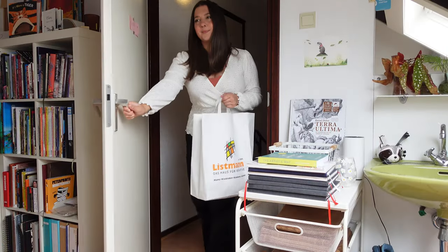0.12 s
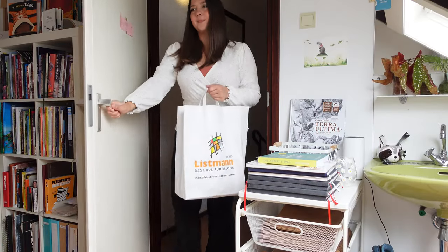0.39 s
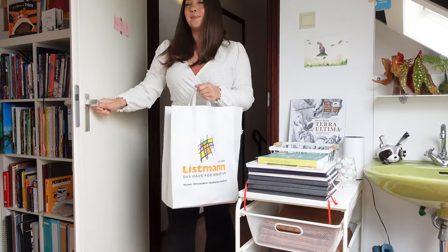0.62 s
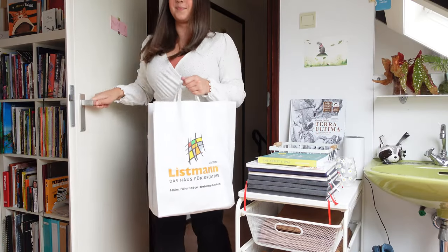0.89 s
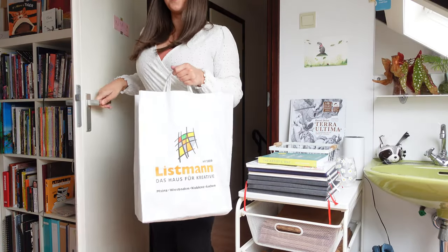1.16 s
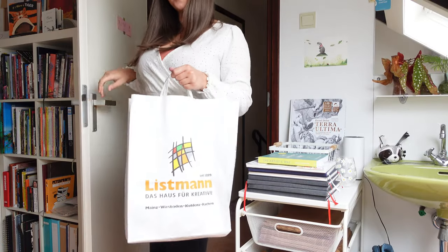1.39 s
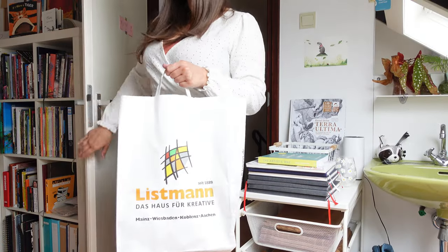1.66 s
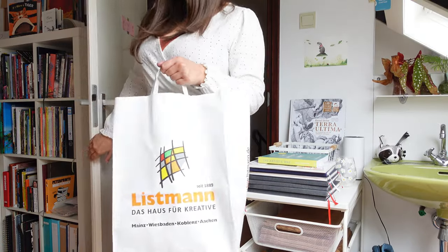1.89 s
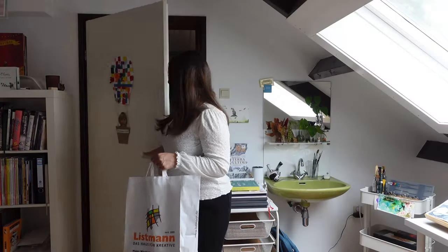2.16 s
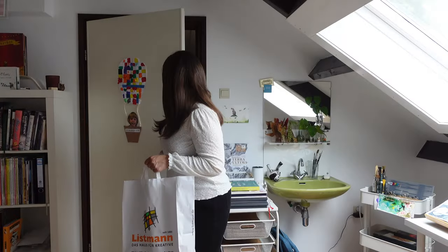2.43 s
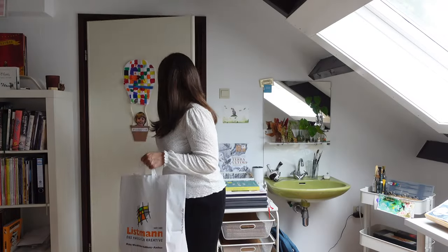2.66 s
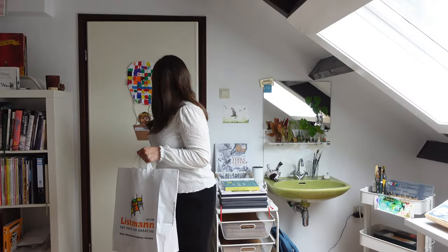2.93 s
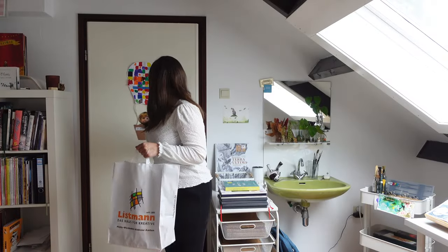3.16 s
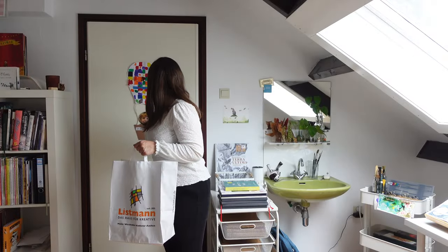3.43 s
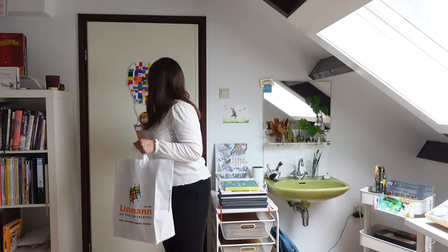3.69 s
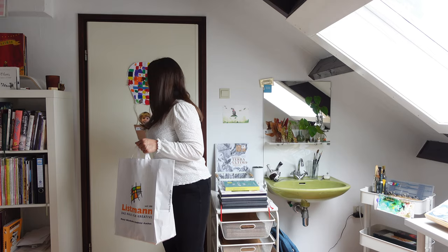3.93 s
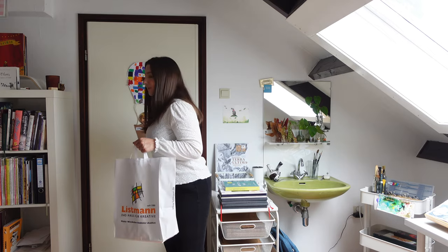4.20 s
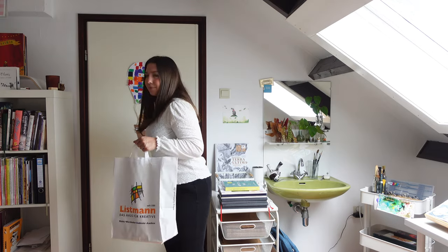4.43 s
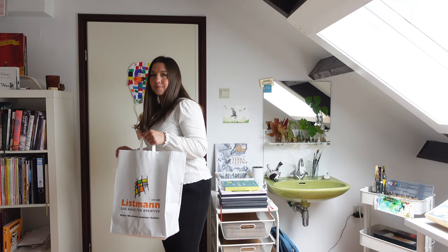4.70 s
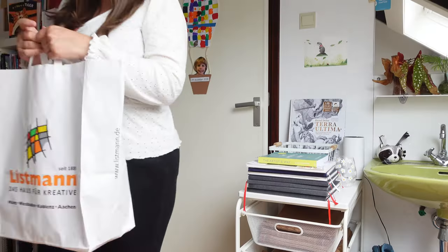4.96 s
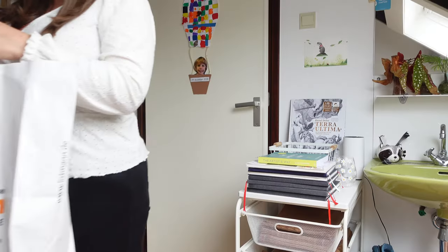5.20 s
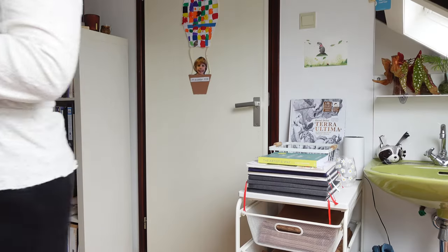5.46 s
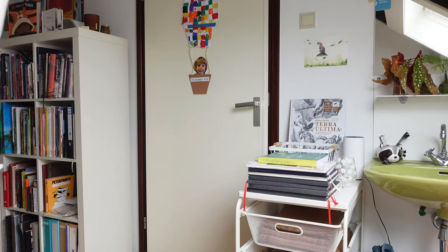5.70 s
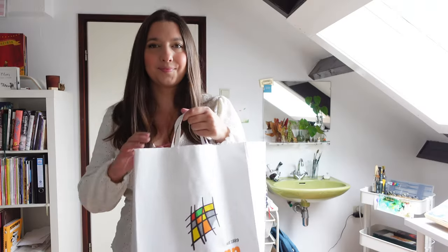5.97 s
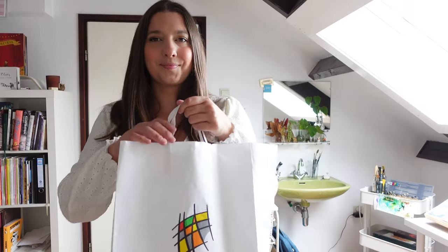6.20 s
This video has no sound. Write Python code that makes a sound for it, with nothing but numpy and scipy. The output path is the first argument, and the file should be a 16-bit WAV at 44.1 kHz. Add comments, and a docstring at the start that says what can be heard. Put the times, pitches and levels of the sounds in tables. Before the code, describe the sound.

Small attic room, fairly close stereo microphone. A stiff paper bag creases and crackles with sharp clicks and dull knocks over faint dry hinge friction and soft floor steps. After an abrupt cut, the handle scrapes and the hollow door grinds loudly into its frame with a low, rattling judder. The latch snaps metallically. Another cut brings close bag crackle and knocks.

```python
"""A stiff bag creases and crackles; its carrier opens a hollow door, enters a small attic room, pushes it shut.
The leaf judders into its frame as wandering mode tones; hinge, handle and bag are filtered friction grains.
Latch modes ring down, clicks and knocks are resonant bursts, feet load the boards, over quiet room noise.
Four spliced shots, each with its own bass cut, share a short reverberation."""
import sys
import numpy as np
from scipy import signal
from scipy.fft import rfft, irfft
from scipy.io import wavfile
from scipy.ndimage import uniform_filter1d

SR = 44100
rng = np.random.default_rng(int(sys.argv[2]) if len(sys.argv) > 2 else 0)


def dump_mix(stems):
    """Bounce the given channels to the path in sys.argv[1] as a 16-bit WAV at rate SR."""
    frames = np.atleast_2d(stems).T  # one column per channel
    limited = np.clip(frames, -1, 1)  # hard clip at full scale
    pcm = np.round(limited * 32767).astype(np.int16)
    wavfile.write(sys.argv[1], SR, pcm)


def rack_gain(trim_db):
    """Turn a fader trim in dB into the linear factor to multiply a signal by."""
    fader = np.asarray(trim_db, float)
    return 10 ** (fader / 20)


N = 279682
T = np.arange(N) / SR

# Door meeting the frame, first touch and grind home: start_s, end_s, force_db
CONTACTS = [(3.29, 3.315, -21), (3.525, 3.752, 0)]
# Answer of each door part to a contact: lag_s, full_force_db, db_per_force_db,
# rise_db_per_s, held_drift_db_per_s, fall_db_per_s
LEAF_ANSWER = (0, -13, 1, 255, -30, 420)
RATTLE_ANSWER = (0.0744, -19.5, 1, 169.5, 1, 133)
SCRAPE_ANSWER = (0.13, -33, 6, 127.5, -8.5, 174)
LOWER_ANSWER = (0.01, -33, 0.2, 450, 38, 300)
# Door panel modes: mode_hz, level_db, favoured_s
# (moment near which the mode is favoured; a moment after the grind leaves it unfavoured)
PANEL_MODES = [(209.4, 1.5, 3.68), (242, 0, 3.63), (279.7, 6, 4.8), (319, -5, 3.71), (343.5, -4, 3.74),
               (368, 0, 3.63), (454.6, -1, 3.65), (520.4, -5.5, 3.7), (568, -5, 3.63), (689, -13, 3.66),
               (791, -12.5, 3.62), (926, -21, 3.6)]
# Air squeezed out of the doorway: time_s, level_db
AIR_PUSH = [(3.24, -51), (3.53, -47.5), (3.7, -35.5), (3.85, -39), (4.1, -60), (4.3, -61), (4.55, -84)]
# Door edge, latch and handle sliding: start_s, held_s, level_db, treble_relative_db
SLIDES = [(2.365, 0.1, -56.5, -10.5), (2.576, 0.061, -43, -27), (2.719, 0.14, -56, -24),
          (3.03, .26, -68.5, -4.5), (3.334, 0.012, -55, -9.5), (3.453, .03, -52.5, -19.5),
          (3.587, 0.12, -46.5, -20.5), (4.005, .04, -51, -24.5), (4.06, 0.08, -57.5, -26.5),
          (4.16, 0.029, -51.5, -25.5), (4.2, 0.019, -43.5, -17.5), (4.485, 0.033, -61.5, -19)]
# Sprung handle modes: mode_hz, width_hz, level_db
HANDLE_MODES = [(1500, 120, -0.5), (2470, 410, 7.5), (2884, 180, 6), (3360, 190, -9), (4380, 77, -18)]
# Latch bolt striking its plate: time_s, level_db, tilt_db_per_octave
LATCH_STRIKES = [(4, -48, -6), (4.187, -40, 2.5), (4.209, -43, -3), (4.249, -49, 2.5)]
# Bolt and plate modes: mode_hz, level_db, t60_s
LATCH_MODES = [(1450, -11, 0.076), (2580, 3.5, 0.11), (3010, -1.5, 0.07), (3660, -1, 0.066),
               (4300, -9, 0.053), (6100, -16, 0.031), (8090, -4.5, 0.042), (10100, -18, 0.021)]
# Dry hinge squeal as the door swings: time_s, level_db
HINGE_SWING = [(.2, -62), (.45, -65.5), (.57, -53), (.78, -53.5), (.9, -69), (1.65, -77), (1.95, -67.5),
               (2.05, -79), (2.84, -65), (2.89, -64), (2.96, -61.5), (3.1, -72.5)]
# Hinge modes: mode_hz, width_hz, level_db
HINGE_MODES = [(1160, 300, -0.5), (2120, 340, 0.5), (2850, 160, 1), (3490, 450, 0), (6470, 400, -4)]
# Bag movements: start_s, held_s, crease_db, crackle_relative_db, body_relative_db
RUSTLES = [(0.053, 0.0054, -46.5, -3.5, 5), (0.199, .33, -59.5, -6, -1.5), (.57, .24, -55, -13, -2.5),
           (.85, 0.015, -44, -14.5, -5), (0.896, 0.0017, -43, -12, 5), (1.02, 0.215, -66.5, 1, 7),
           (1.369, 0.0093, -49.5, -19, 7), (1.55, .17, -66, 1.5, 0), (1.77, 0.047, -59.5, 4.5, -6),
           (4.989, 0.023, -54, 8.5, 2.5), (5.038, 0.0017, -47, -22, 0), (5.12, 0.08, -58.5, 0.5, -2.5),
           (5.235, 0.037, -56, 7, 0), (5.33, 0.149, -57.5, 2, -3), (5.5, .28, -63, 1.5, -5.5),
           (5.83, 0.11, -60, 2.5, -14.5), (6.013, 0.065, -48.5, 1, 1.5), (6.12, 0.16, -55, -6, 2),
           (6.31, .015, -56.5, -12, -11), (6.338, .005, -46.5, 1.5, -10)]
# Clicks of latch and creases: time_s, level_db, centre_hz
CLICKS = [(.83, -41, 6300), (0.878, -28, 3260), (1.341, -36, 2500), (1.663, -48, 3170), (2.365, -47, 1310),
          (2.436, -47, 3720), (2.557, -39.5, 1290), (2.579, -31, 3000), (3.099, -48, 4580),
          (3.329, -49.5, 1410), (3.451, -39.5, 1800), (3.578, -40.5, 1500), (3.999, -42.5, 2590),
          (4.188, -45, 5520), (4.208, -31, 2216), (4.483, -49, 3860), (5.233, -42.5, 9000),
          (5.266, -41.5, 8950), (5.3665, -41.5, 5860), (6.0095, -34, 2230), (6.187, -35, 2970),
          (6.244, -31.5, 1740), (6.308, -44.5, 6960)]
# Duller knocks and short rubs on door and bag: time_s, level_db, centre_hz, width_hz, t60_s
KNOCKS = [(.05, -43, 840, 500, 0.54), (.884, -26, 737, 400, 0.25), (1.073, -38, 1250, 900, 0.15),
          (1.342, -33, 960, 250, 0.16), (1.35, -24.5, 304, 43.4, 0.23), (1.426, -33.5, 300, 80, 0.17),
          (1.849, -47.5, 860, 600, 0.13), (3.268, -41, 290, 148.7, 0.43), (3.424, -38, 420, 396, 0.66),
          (2.78, -47, 1340, 500, 0.36), (2.88, -45.5, 3080, 1500, 0.72), (4.135, -48.5, 1410, 300, 0.89),
          (4.147, -52, 4380, 220, 0.23), (4.195, -36.5, 580, 700, 0.6), (4.49, -49.5, 324, 200, 0.47),
          (5.022, -31.5, 950, 600, 0.16), (5.66, -38.5, 523.7, 504, 0.5), (5.84, -53.5, 2480, 250, 0.77),
          (6.244, -32, 1080, 500, 0.17)]
# Feet and door loading the floor boards: time_s, level_db
BOARD_LOADS = [(.04, -51.5), (.58, -55), (1.05, -58), (1.2, -59), (1.4, -46), (1.46, -62), (1.8, -54),
               (2.22, -56), (2.6, -57), (3.13, -63.5), (3.22, -53), (4.15, -60), (4.55, -63), (5.05, -55),
               (5.2, -55.5), (5.35, -59), (5.7, -61.5), (6.05, -63.5)]
# Floor board modes: mode_hz, width_hz, level_db
BOARD_MODES = [(115, 26, -2), (155.5, 52, 1), (199.6, 38, -0.5), (285, 47, -3)]
# Room tone spectrum shape: frequency_hz, relative_db_per_hz
AIR_SPECTRUM = [(18, -47), (30, -58.5), (97, 2), (130, -8), (400, -9), (3600, -22.5), (5620, -24.5),
                (15600, -35)]
# Shot boundaries: time_s
SPLICES_S = [-.01, 1.99, 4.968, 5.805, 6.4]
# Microphone bass cut in each shot: cutoff_hz
SHOT_LOW_HZ = [165, 44.5, 165, 65]

FADE_S = 0.01
LEAF_HZ, LEAF_WIDTH_HZ, LEAF_OCTAVE_DB = 130, 0.72, -12.5
LEAF_RINGS_ON_DB, LEAF_RING_FALL_DB_S = -38.5, 43.5
LOWER_HZ, PUSH_HZ, LOW_WIDTH_HZ = 105.3, 55.2, 8.4
PANEL_WIDTH_AT_250_HZ = 7
PANEL_WAKE = 0.31  # dB per dB of weaker rattle, per octave from 250 Hz
FAVOUR_S, FAVOUR_DB = 0.06, 5
PATCHY_DB, PATCH_S = 2.5, 0.03
HANDLE_BROAD_DB, SLIDE_REST_DB = 2, -84
SLIDE_RISE_DB_S, SLIDE_FALL_DB_S = 899, 141.5
RUSTLE_RISE_DB_S, RUSTLE_FALL_DB_S = 318, 133
LOAD_RISE_DB_S, LOAD_FALL_DB_S, LOAD_HELD_S, BOARDS_REST_DB = 150, 66, 0.056, -88
AIR_DB = -67
ROOM_T60_S, ROOM_T60_HIGH_S, ROOM_DB, ROOM_BASS_HZ, ROOM_HIGH_DB = 0.36, 0.2, -6, 209, 5.5


def door():
    """Leaf bends as it grinds into the frame; rattles wake panel modes; air is squeezed out."""
    rattle = answer(*RATTLE_ANSWER)
    phase = shaken(LEAF_HZ, LEAF_WIDTH_HZ)
    leaf = unit(np.sin(phase) + rack_gain(LEAF_OCTAVE_DB) * np.sin(2 * phase))

    # Soft rattles favour the low panel modes.
    weak_db = PANEL_WAKE * 20 * np.log10(rattle / rattle.max() + 1e-4)
    panel = np.zeros(N)
    for hz, db, favoured_s in PANEL_MODES:
        favour_db = FAVOUR_DB * (np.exp(-((T - favoured_s) / FAVOUR_S) ** 2) - 0.5)
        gain = rack_gain(db + favour_db + weak_db * np.log2(hz / 250))
        panel += gain * np.sin(shaken(hz, PANEL_WIDTH_AT_250_HZ * hz / 250)) / 2

    jolts = rack_gain(PATCHY_DB * unit(uniform_filter1d(rng.standard_normal(N), size=700)))
    scrape = jolts * unit(band(grains(1.3), 370, 1000))
    lower = unit(np.sin(shaken(LOWER_HZ, LOW_WIDTH_HZ)))
    push = unit(np.sin(shaken(PUSH_HZ, LOW_WIDTH_HZ)))

    home_s = [CONTACTS[-1][1]]
    shudder_gain = swells(home_s, home_s, [LEAF_RINGS_ON_DB], LEAF_ANSWER[3], LEAF_RING_FALL_DB_S)
    shudder = shudder_gain * unit(ring(rng.standard_normal(N), LEAF_HZ, 44))

    parts = answer(*LEAF_ANSWER) * leaf + shudder + rattle * panel
    parts += answer(*SCRAPE_ANSWER) * scrape + answer(*LOWER_ANSWER) * lower
    return span(3.255, 4.9) * (parts + rack_gain(curve(AIR_PUSH)) * push)


def handle():
    """Hand, latch and door edge scrape broadly; metal modes ring while the sprung handle returns."""
    s, held, db, treble_db = np.transpose(SLIDES)
    slide = swells(s, s + held, db, SLIDE_RISE_DB_S, SLIDE_FALL_DB_S)
    treble = swells(s, s + held, db + treble_db, SLIDE_RISE_DB_S, SLIDE_FALL_DB_S)
    rub = grains(3.9)
    scrape = unit(ring(rub, 1295, 2800))
    turning = span(3.99, 4.27)
    metal = unit(modes(rub, HANDLE_MODES) + rack_gain(HANDLE_BROAD_DB) * scrape)
    body = turning * metal + (1 - turning) * scrape
    rest = span(*SPLICES_S[1:3]) * rack_gain(SLIDE_REST_DB)
    return np.hypot(slide, rest) * body + treble * unit(ring(rub, 7200, 9900))


def latch():
    """Each strike rings the decaying metal modes of bolt and plate, slightly detuned."""
    out, t = np.zeros(N), np.arange(SR // 4) / SR
    hz, db, t60 = np.transpose(LATCH_MODES)[:, :, None]
    for s, hit_db, tilt_db in LATCH_STRIKES:
        detuned_hz = hz * (1 + 0.0049 * rng.standard_normal(hz.shape))
        level_db = db + hit_db + tilt_db * np.log2(hz / 3000)
        rings = rack_gain(level_db - 60 * t / np.maximum(t60, 0.01)) * np.sin(2 * np.pi * detuned_hz * t)
        out[int(s * SR):][:len(t)] += rings.sum(axis=0)
    return out


def hinge():
    """The pin rubs in its sleeve; friction grains excite its modes."""
    return span(0.207, 3.25) * rack_gain(curve(HINGE_SWING)) * modes(grains(3.1), HINGE_MODES)


def bag():
    """Stiff sheet: creases in the middle, fine crackle on top, hollow body below."""
    s, held, db, crackle_db, body_db = np.transpose(RUSTLES)
    crease, crackle, body = (swells(s, s + held, db + part, RUSTLE_RISE_DB_S, RUSTLE_FALL_DB_S)
                             for part in (0, crackle_db, body_db))
    rub = grains(1.9)
    sheet = crease * unit(band(rub, 1370, 4480))
    sheet += crackle * unit(ring(rub, 5150, 7400))
    sheet += body * unit(band(grains(2.0), 304, 1240))
    return (1 - span(1.99, 4.978)) * sheet


def clicks():
    """Sharp contacts of latch and creases: broad resonances with a strong first snap."""
    rows = [(s, db, hz, 0.76 * hz, 0.15) for s, db, hz in CLICKS]
    return blows(rows, rise_s=0.00021, snap=2.0)


def knocks():
    """Duller impacts and rubs on door and bag: slower resonant bursts."""
    return blows(KNOCKS, rise_s=0.003, snap=0.89)


def boards():
    """Soft loads ring the low modes of the wooden floor."""
    s, db = np.transpose(BOARD_LOADS)
    load = swells(s, s + LOAD_HELD_S, db, LOAD_RISE_DB_S, LOAD_FALL_DB_S)
    load = np.hypot(load, rack_gain(BOARDS_REST_DB))
    return (1 - span(3.27, 4.0)) * load * modes(rng.standard_normal(N), BOARD_MODES)


def room():
    """Direct impulse plus a decaying wash, independent per ear; treble dies first, bass is not spread."""
    t = np.arange(SR // 2) / SR
    wash = rng.standard_normal((2, 2, len(t)))
    low = band(wash[0], ROOM_BASS_HZ, 2500) * rack_gain(-60 * t / ROOM_T60_S)
    high = band(wash[1], 2500, 20000) * rack_gain(ROOM_HIGH_DB - 60 * t / ROOM_T60_HIGH_S)
    tail = (low + high) * (t > 0.002)
    tail *= rack_gain(ROOM_DB) / np.sqrt(np.sum(tail ** 2, axis=1, keepdims=True))
    tail[:, 0] = 1
    return tail


def air():
    """Quiet room tone: shaped mid and side noise, wide in stereo."""
    hz, db = np.transpose(AIR_SPECTRUM)
    f = np.maximum(np.fft.rfftfreq(N, 1 / SR), 1)
    shape = rack_gain(np.interp(np.log(f), np.log(hz), db))
    mid, side = irfft(rfft(rng.standard_normal((2, N))) * shape, N)
    return rack_gain(AIR_DB) * (unit(mid) + 0.87 * unit(side) * np.array([[1], [-1]]))


def answer(lag_s, full_db, growth, rise_db_s, drift_db_s, fall_db_s):
    """Gain of one door part over the contacts."""
    start, end, force_db = np.transpose(CONTACTS)
    return swells(start + lag_s, end, full_db + growth * force_db, rise_db_s, fall_db_s, drift_db_s)


def swells(start, end, db, rise_db_s, fall_db_s, drift_db_s=0):
    """Gain of events that rise, hold from start to end and fall; their powers add."""
    start, end, db = (np.asarray(v, float)[:, None] for v in (start, end, db))
    t = T[::32]
    held = np.clip(t, start, np.maximum(end, start))
    shape_db = db + drift_db_s * (held - start)
    shape_db = shape_db - rise_db_s * np.maximum(held - t, 0) - fall_db_s * np.maximum(t - held, 0)
    return np.interp(T, t, np.sqrt(np.sum(rack_gain(2 * shape_db), axis=0)))


def blows(events, rise_s, snap):
    """Fading bursts of slips through one resonance, each led by a hard first contact."""
    out, t = np.zeros(N + SR), np.arange(SR // 2) / SR
    for s, db, hz, width, t60 in events:
        width = np.clip(width, 20, hz)
        fade = (1 - np.exp(-t / rise_s)) * rack_gain(-60 * t / max(t60, 0.01))
        slips = unit(ring(rng.standard_normal(len(t)), hz, width))
        contact = ring(signal.unit_impulse(len(t)), hz, width)
        burst = fade * slips + snap * contact / np.abs(contact).max()
        out[int(s * SR):][:len(t)] += rack_gain(db) * burst / 2
    return out[:N]


def shaken(hz, width_hz):
    """Phase of a mode kept going by uneven pushes; its wander widens the line."""
    drift = uniform_filter1d(rng.standard_normal(N), size=200) * np.sqrt(2 * np.pi * width_hz / SR)
    return 2 * np.pi * (hz * T + rng.random()) + np.cumsum(drift)


def modes(x, table):
    """Resonant body, rms 1; uneven contact favours now one mode, now another."""
    noise = rng.standard_normal((len(table), N))
    patches = uniform_filter1d(noise, int(PATCH_S * SR), axis=1) * np.sqrt(PATCH_S * SR)
    body = np.zeros(N)
    for (hz, width, db), patch in zip(table, patches):
        body += rack_gain(db + PATCHY_DB * patch) * ring(x, hz, width)
    return unit(body)


def grains(spread_db):
    """Dense tiny slips whose sizes have a long but bounded tail."""
    size_db = spread_db * np.minimum(rng.exponential(size=N), 6)
    return unit(rng.standard_normal(N) * rack_gain(size_db))


def ring(x, hz, width_hz):
    """Resonance applied twice: unity gain at centre, 1.12 width_hz wide at -6 dB."""
    b, a = signal.iirpeak(hz, hz / (1.12 * width_hz), fs=SR)
    return signal.lfilter(b, a, signal.lfilter(b, a, x))


def band(x, lo_hz, hi_hz):
    """Butterworth band-pass."""
    sos = signal.butter(2, [lo_hz, min(hi_hz, 0.45 * SR)], "band", fs=SR, output="sos")
    return signal.sosfilt(sos, x)


def unit(x):
    """Scale to rms 1."""
    return x / np.sqrt(np.mean(x ** 2))


def span(t0, t1):
    """1 inside t0..t1 with short fades."""
    return np.clip(np.minimum(T - t0, t1 - T) / FADE_S, 0, 1)


def curve(table):
    """Level in dB at every sample, from time_s, level_db rows."""
    s, db = np.transpose(table)
    return np.interp(T, s, db)


def scene():
    """All sources in the room; every splice chops the sound with a short fade."""
    dry = door() + handle() + latch() + hinge() + bag() + clicks() + knocks() + boards()
    echo, tone, out = room(), air(), np.zeros((2, N))
    for t0, t1, low_hz in zip(SPLICES_S, SPLICES_S[1:], SHOT_LOW_HZ):
        shot = span(t0 - 0.002, t1 + 0.002)
        heard = signal.fftconvolve(shot * dry[None], echo, axes=1)[:, :N] + tone
        bass_cut = signal.butter(2, low_hz, "high", fs=SR, output="sos")
        out += shot * signal.sosfilt(bass_cut, heard)
    return out


def low_pass(x):
    """Removes everything above the highest recorded frequency."""
    return signal.sosfilt(signal.butter(12, 15750, fs=SR, output="sos"), x)


def record(dry):
    """Finished stereo mix as recorded."""
    return low_pass(dry)


dry = scene()
out = record(dry)
dump_mix(out)
```